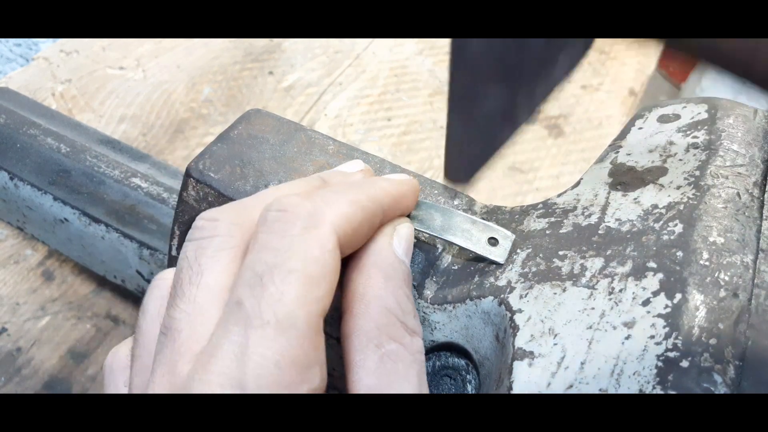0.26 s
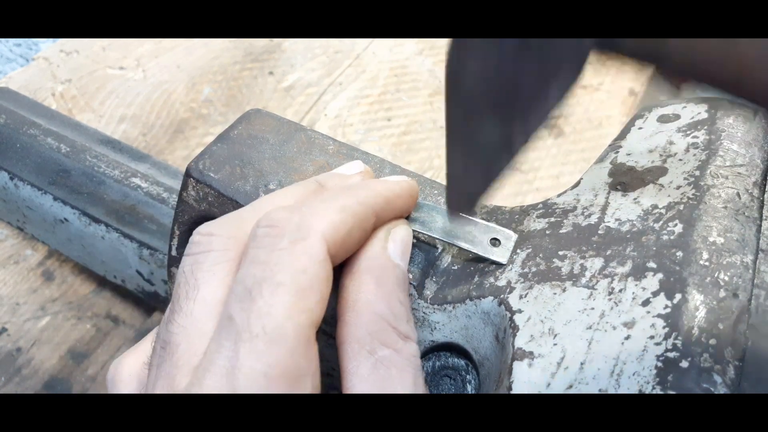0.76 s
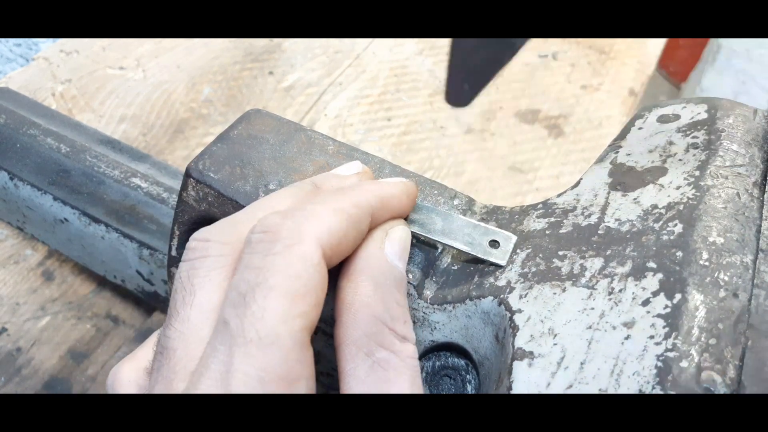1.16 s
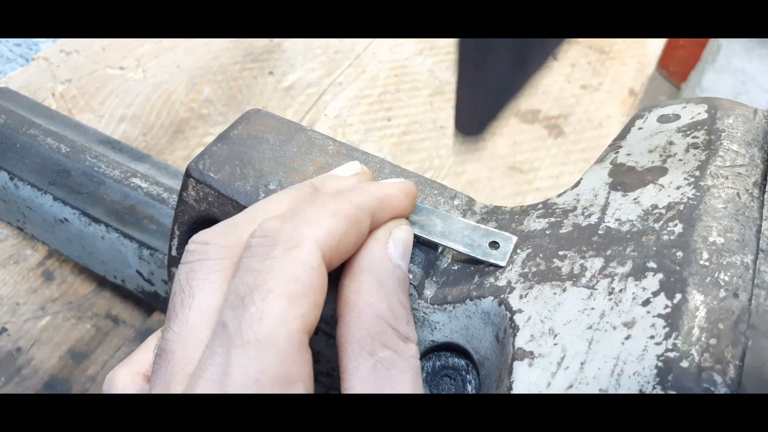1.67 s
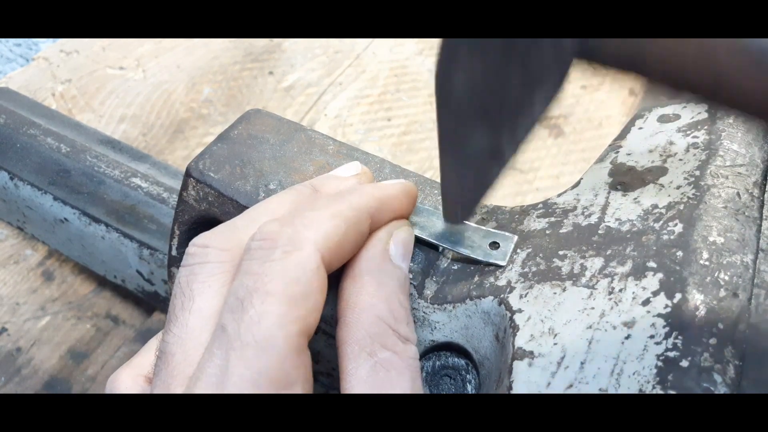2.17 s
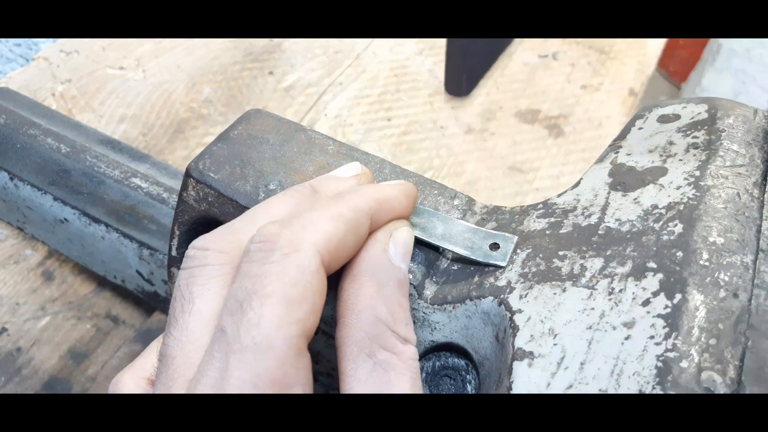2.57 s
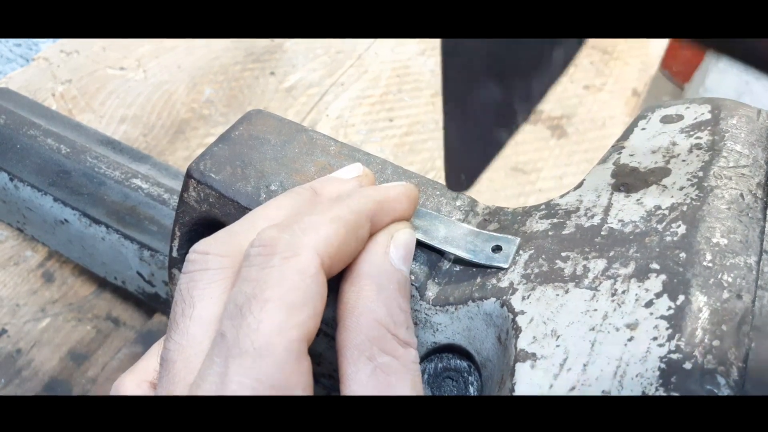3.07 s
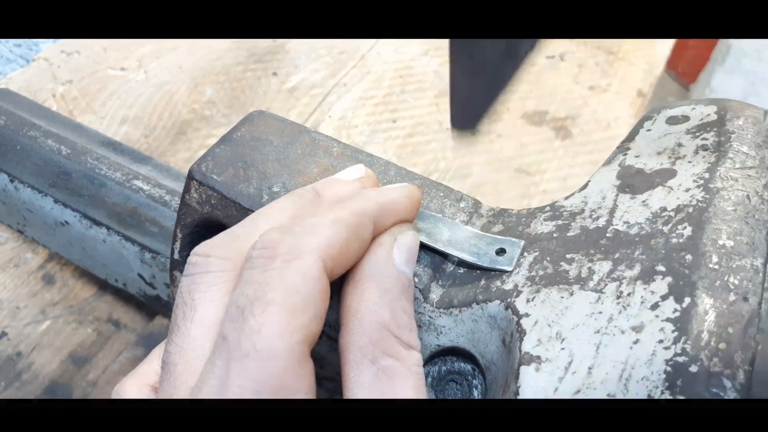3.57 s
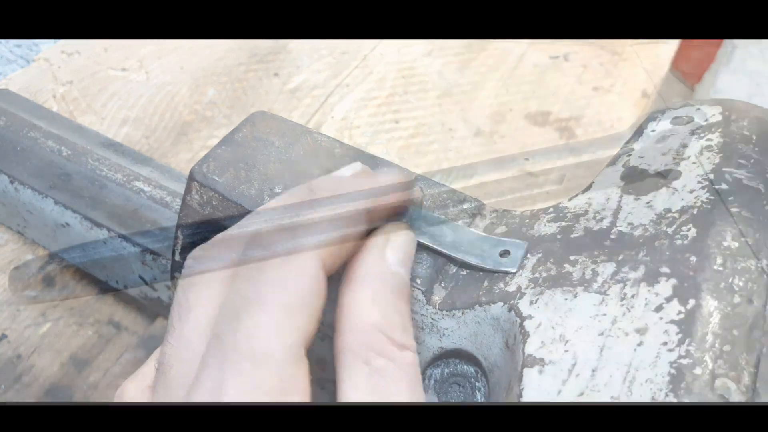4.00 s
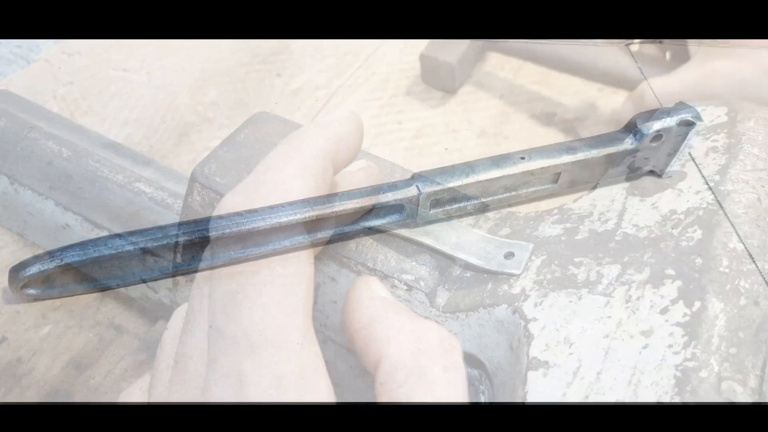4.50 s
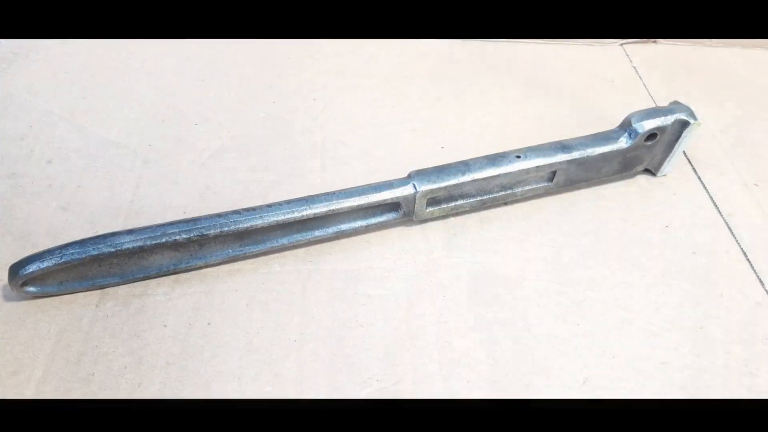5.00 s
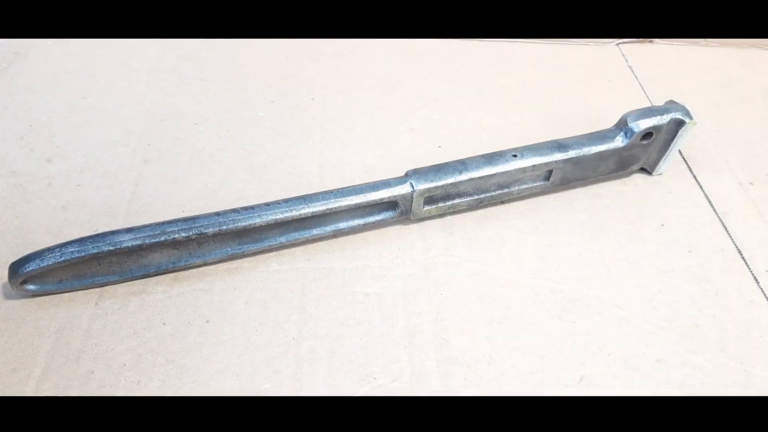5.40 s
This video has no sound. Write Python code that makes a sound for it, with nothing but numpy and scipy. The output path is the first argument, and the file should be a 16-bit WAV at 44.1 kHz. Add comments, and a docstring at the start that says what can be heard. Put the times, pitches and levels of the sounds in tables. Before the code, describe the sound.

A hammer taps a small steel strip on a bench vise anvil, light then firmer, each sharp click followed by a woody bench boom.

```python
"""In a small workshop, a hammer taps a steel strip held by hand on the anvil of a bench vise, close by.
Each blow is filtered noise bursts for strike, slap and bounce, with a dull clank of the hammer head.
The wooden bench booms a few milliseconds later in wandering sine modes, with a noise rattle; the room answers.
Low rumble and faint gliding whistles lie beneath; after the last blow a soft distant rush of noise comes up."""
import sys
import numpy as np
from scipy import signal
from scipy.fft import rfft, irfft, next_fast_len
from scipy.io import wavfile
from scipy.ndimage import uniform_filter1d

SR = 44100
rng = np.random.default_rng(int(sys.argv[2]) if len(sys.argv) > 2 else 0)


def pcm_store(signal):
    """Save signal as 16-bit PCM."""
    levels = np.round(np.clip(np.atleast_2d(signal), -1, 1) * 32767)
    wavfile.write(sys.argv[1], SR, levels.astype(np.int16).T)


N = 249165
T = np.arange(SR) / SR  # seconds: the one-second span of each blow
PAN_SIDES = np.array([[.5], [-.5]])  # share of a pan in dB for left and right


def undb(db):
    """Decibels to gain."""
    return 10 ** (np.asarray(db) / 20)


def fade(t60_s):
    """Exponential decay that loses 60 dB in t60_s seconds."""
    return np.exp(-np.log(1000) * T / t60_s)


def unit(x):
    """Scale to unit energy, averaged over the channels."""
    return x / np.sqrt(np.mean(np.sum(x ** 2, axis=-1)))


def bins(x):
    """Spectrum frequencies of x in Hz, kept at 1 or above for the logarithm."""
    return np.maximum(np.fft.rfftfreq(x.shape[-1], 1 / SR), 1)


def along(hz, points_hz, values):
    """Read values off a curve on a log-frequency axis."""
    return np.interp(np.log(hz), np.log(points_hz), values)


def over_time(t, curve):
    """Read an automation curve of (time, value) points."""
    return np.interp(t, *np.transpose(curve))


def colour(x, spectrum):
    """Minimum-phase filter that follows (Hz, dB) points, so nothing sounds ahead of its cause."""
    size = next_fast_len(x.shape[-1] + 4096) // 2 * 2
    gain_db = along(bins(np.empty(size)), *np.transpose(spectrum))
    # folding the cepstrum onto positive times makes the filter causal
    cepstrum = irfft(np.log(undb(gain_db)))
    cepstrum[1:size // 2] *= 2
    cepstrum[size // 2 + 1:] = 0
    return irfft(rfft(x, size) * np.exp(rfft(cepstrum)))[..., :x.shape[-1]]


def air(size, apart_hz):
    """Stereo noise, alike in the bass and unrelated above apart_hz."""
    mid, side = rng.standard_normal((2, size))
    width = np.clip(bins(side) / apart_hz, .22, 1)
    side = irfft(rfft(side) * width, size)
    return np.array([mid + side, mid - side])


def add(out, x, start_s):
    """Mix x into out from start_s on, trimming whatever falls outside."""
    i = int(round(start_s * SR))
    a, b = max(i, 0), min(i + x.shape[-1], out.shape[-1])
    out[:, a:b] += x[:, a - i:b - i]


def burst(t60_s):
    """A short crack: decaying noise with its spectrum evened out, then faded once more."""
    spectrum = rfft(rng.standard_normal((2, SR)) * fade(t60_s))
    evened = irfft(spectrum / np.abs(spectrum) ** .7, SR)
    return unit(evened * fade(4 * t60_s))


def contact(t60_s=0.0083):
    """One touch of steel; such short waves reach the two channels partly in opposite phase."""
    crack = burst(t60_s)
    return unit(crack - .17 * crack[::-1])


# tone of steel on steel, before the resonances of the strip: pitch_hz, density_db [dB per Hz]
STEEL_TONE = [(150, -14.5), (500, -4), (1100, -16), (2400, -17), (3600, -18.5), (4900, -14), (6200, -9.5),
              (6900, -10.5), (8300, -6.5), (10200, -7), (11900, -5), (13500, 2), (15600, -5)]


def clatter(ring_db, low_hz, high_hz, slap_ms, slap_db, bounce_ms, bounce_db,
            chatter_db=-10.0, chatter_t60_s=0.16, ring_width_hz=500, lift_db=7.5):
    """The hammer meets the strip, the strip slaps the anvil, bounces once and chatters to rest."""
    out = np.zeros((2, SR))
    for lag_ms, level_db in ((0, 0), (slap_ms, slap_db), (bounce_ms, bounce_db)):
        add(out, undb(level_db) * contact(), lag_ms / 1000)
    out = unit(out) + undb(chatter_db) * burst(chatter_t60_s)
    hz = np.geomspace(100, 17000, 400)
    # fingers and anvil damp the strip, so its two resonances are broad
    rings_db = sum(lift_db / (1 + ((hz - centre) / ring_width_hz) ** 2) for centre in (low_hz, high_hz))
    tone_db = along(hz, *np.transpose(STEEL_TONE)) + rings_db
    out = unit(colour(out, np.c_[hz, tone_db]))
    return colour(out, [(3000, -3.0), (6000, ring_db + 9), (9000, ring_db + 3.0), (11500, -0.53)])


# tone of the hammer head stopping dead: pitch_hz, density_db [dB per Hz]
CLANK_TONE = [(150, -20.5), (400, 10), (900, 2), (1500, -3.5), (2500, -1.5), (3300, -10), (6000, -30)]


def clank(pan_db=-10, gain_db=3):
    """A square blow stops the head at once: a single pressure pulse, heard mostly on the right."""
    pulse = unit(colour(signal.unit_impulse(SR), CLANK_TONE))
    return undb(gain_db) * unit(pulse * undb(pan_db * PAN_SIDES))


# modes of bench and vise, before the force of the blow: pitch_hz, level_db
BENCH_MODES = [(46, -19.5), (63, -14), (86, -13.5), (110, -15), (140, -18), (165, -15), (184, -9),
               (218, -8.5), (254, -1), (290, -0.5), (316, -0.5), (351, -1.5), (385, -19), (422, -7.5),
               (484, -20), (544, -14), (630, -13.5), (686, -23), (715, -8), (743, -30), (790, -16),
               (834, -26.5), (931, -8), (990, -14), (1114, -21.5), (1184, -20), (1480, -14.5),
               (1798, -30.5), (2460, -24), (3052, -24)]
# how long the modes ring: pitch_hz, t60_s
BENCH_RING_TIMES = [(60, .9), (150, .55), (260, .38), (800, .38), (3000, .33)]
# loose wood and things on the bench, before the force of the blow: pitch_hz, density_db [dB per Hz]
RATTLE_TONE = [(25, -35.5), (50, -16), (130, -13), (270, -1), (430, -4), (550, -11.5), (760, 2), (950, -2),
               (1300, -18), (2000, -25), (2500, -30.5), (3500, -29), (8000, -40)]


def bench(thud_db, knock_db, crunch_db, phases, rise_s=0.0006, ring_db=-8, rattle_db=-5,
          rattle_t60_s=.16, sag=0.13, apart_hz=900):
    """The bench booms in its modes and rattles; firm blows wake the upper ones, the deepest vary little."""
    hz, mode_db = np.transpose(BENCH_MODES)
    drive = [(110, sag * thud_db + 9.5), (250, thud_db), (420, thud_db),
             (650, knock_db + 6.0), (1000, knock_db + 3.5), (1500, crunch_db + 17.0)]
    gains = undb(mode_db + along(hz, *np.transpose(drive)))
    times_s = along(hz, *np.transpose(BENCH_RING_TIMES))
    boom = np.zeros((2, SR))
    for f, gain, t60_s, (phase, spread) in zip(hz, gains, times_s, phases):
        stereo_phase = np.array([[1], [-1]]) * spread * np.clip(f / apart_hz, .2, 1) / 2
        # random pitch wander roughens each ringing mode
        wander = np.interp(T, np.linspace(0, 1, 60), rng.standard_normal(60)) * .02
        angle = 2 * np.pi * f * np.cumsum(1 + wander) / SR
        boom += gain * unit(np.sin(angle + phase + stereo_phase) * fade(t60_s))
    rattle = unit(colour(air(SR, 1900) * fade(rattle_t60_s), RATTLE_TONE))
    out = undb(ring_db) * boom + undb(rattle_db) * colour(rattle, drive)
    return out * (1 - np.exp(-T / rise_s))


# the room, band by band: pitch_hz, level_db [reverberant], t60_s
ROOM_BANDS = [(100, -0.5, 0.55), (684, 2, 0.51), (1500, -6.5, 0.7), (2846, -2.5, 0.49), (5370, -11.5, 0.48),
              (7900, -13, 0.45), (12200, -11.5, 0.33), (15170, -16.5, .32)]


def workshop(x, echo_s=.028, echo_db=-19, echo_t60_s=0.043, build_s=0.014):
    """A diffuse tail that dies sooner in the treble, and one early scatter off the ceiling."""
    hz, levels_db, times_s = np.transpose(ROOM_BANDS)
    noise = rfft(air(SR, 1000))
    response = np.zeros((2, SR))
    for share, level_db, t60_s in zip(np.eye(len(hz)), levels_db, times_s):
        band = irfft(noise * along(bins(T), hz, share), SR)
        envelope = unit(fade(t60_s) * (1 - np.exp(-T / build_s)))
        response += undb(level_db) * band * envelope / np.sqrt(2)
    scatter = unit(rng.standard_normal((2, SR)) * fade(echo_t60_s))
    add(response, undb(echo_db) * scatter, echo_s)
    return signal.fftconvolve(x, response, axes=1)[:, :x.shape[1]]


# a sharper click kicks the strip higher, so it slaps down later; SLAP_MS is the lag at a click of 0 dB
SLAP_MS, SLAP_MS_PER_DB, SLAP_DB, BOUNCE_DB = .5, 0.21, 2, -5
# lower resonance of the strip; largest share by which it moves from blow to blow
LOW_RING_HZ, LOW_RING_SPREAD = 8115, .04
# crunch, the drive of the topmost bench modes: at a thud and knock of 0 dB; its floor under light taps
CRUNCH_DB, CRUNCH_LEAST_DB = -25, -26.5
CRUNCH_PER_THUD, CRUNCH_PER_KNOCK = 1.655, .75  # dB per dB
# one row a blow, light taps first and firm ones later, relative levels; the ring moves with the spot struck:
# start_s, click_db [steel], thud_db [bench], knock_db [bench], clank_db [hammer],
# ring_db [5-10 kHz, against the click], high_ring_hz
HAMMER_BLOWS = [(-0.045, -0.5, -6.5, -20.5, -23.5, -4, 13300), (0.2322, 3, -6.5, -19, -26.5, -3, 13500),
                (0.5072, 1.7, -4.5, -17, -24.5, -3.5, 13600), (0.7813, 6.5, 5, -9.5, -16, -6, 11500),
                (1.0653, 5, -2.5, -14.5, -24.5, -4.5, 13000), (1.3509, 7.5, 4.5, -13.5, -19.5, -7, 13500),
                (1.6391, 9.5, 6.5, 2, -1.5, -7.5, 11400), (1.9295, 6, 9, 2, -11.5, -8.5, 11540),
                (2.206, 4.5, 4, 0.5, -16.5, -4, 13070), (2.4891, 4.5, 10, 5, -13, -6.5, 12150),
                (2.7802, 5.5, 6.5, 3.5, -14, -4.5, 12320), (3.512, 6.5, 4.5, 1.5, -1.5, -8, 12500),
                (3.8197, 3.5, 10, 4.5, -16, -6.5, 12050)]
# heavier blows bounce for longer, up to a limit: thud_db, bounce_lag_ms
BOUNCE_LAGS = [(-6, 3.5), (0.5, 6.6)]


def hammering(near_db=1.92, bench_lag_s=0.0041, steel_pan_db=-3, bench_pan_db=-0.7, bench_room_db=-4):
    """All blows with their room; the force of each sets its slap, bounce and crunch."""
    out = np.zeros((2, N))
    phases = rng.uniform(-np.pi, np.pi, (len(BENCH_MODES), 2))
    for start_s, click_db, thud_db, knock_db, clank_db, ring_db, high_hz in HAMMER_BLOWS:
        slap_ms = SLAP_MS + SLAP_MS_PER_DB * click_db
        bounce_ms = np.interp(thud_db, *np.transpose(BOUNCE_LAGS))
        low_hz = LOW_RING_HZ * (1 + LOW_RING_SPREAD * rng.uniform(-1, 1))
        crunch_db = CRUNCH_DB + CRUNCH_PER_THUD * thud_db + CRUNCH_PER_KNOCK * knock_db
        crunch_db = max(CRUNCH_LEAST_DB, crunch_db)
        strip = clatter(ring_db, low_hz, high_hz, slap_ms, SLAP_DB, bounce_ms, BOUNCE_DB)
        steel = undb(click_db) * strip
        wood = np.zeros((2, SR))
        add(wood, bench(thud_db, knock_db, crunch_db, phases), bench_lag_s)
        near_steel = steel * undb(near_db + steel_pan_db * PAN_SIDES)
        near_wood = wood * undb(bench_pan_db * PAN_SIDES)
        add(out, near_steel + near_wood, start_s)
        add(out, undb(clank_db) * clank(), start_s + slap_ms / 1000)
        # each blow draws a fresh diffuse noise tail
        add(out, workshop(steel + undb(bench_room_db) * wood), start_s)
    return out


def steady(spectrum):
    """Continuous stereo noise of the given tone, at unit power."""
    return unit(colour(air(N, 1200), spectrum)) * np.sqrt(N)


RUMBLE_DB = -53  # base that the level curve is added to
# tone of the low workshop rumble: pitch_hz, density_db [dB per Hz]
RUMBLE_TONE = [(20, -31), (35, -20), (58, -2.5), (90, -4.5), (150, -14.5), (310, -9.5), (450, -25.5),
               (900, -32), (1600, -45.5), (4000, -55.5), (16000, -50.5)]
# its slow level ride, on top of the base: time_s, level_db
RUMBLE_RIDE = [(0, -3.5), (3.4, -3), (4.3, -4.5), (4.7, -6), (5.65, -8)]


def rumble():
    """A low bed of filtered noise whose level sinks towards the end."""
    t = np.arange(N) / SR
    return steady(RUMBLE_TONE) * undb(RUMBLE_DB + over_time(t, RUMBLE_RIDE))


WHISTLE_DB, WHISTLE_DB_PER_OCTAVE = -71.5, -2  # peak at 2.5 kHz; the high ones are fainter
# faint thin whistles around the blows: start_s, end_s, start_hz, middle_hz, end_hz
WHISTLE_GLIDES = [(0.134, 0.208, 8100, 7650, 6900), (.99, 1.081, 2280, 2500, 2530),
                  (1.156, 1.375, 2560, 2632, 2620), (1.521, 1.673, 2560, 2570, 2800),
                  (2.376, 2.496, 8800, 9200, 7200), (2.656, 2.798, 8300, 9360, 7230)]


def whistles():
    """Faint gliding sines that swell and fade, most of them leading up to a blow."""
    out = np.zeros((2, N))
    for start_s, end_s, *glide_hz in WHISTLE_GLIDES:
        u = np.linspace(0, 1, int((end_s - start_s) * SR))
        hz = np.polyval(np.polyfit([0, .5, 1], glide_hz, 2), u)
        # pitch jitter, drawn apart for each channel, blurs the tone
        jittered_hz = hz + 900 * rng.standard_normal((2, len(u)))
        phase = 2 * np.pi * np.cumsum(jittered_hz, axis=1) / SR
        level_db = WHISTLE_DB + WHISTLE_DB_PER_OCTAVE * np.log2(hz / 2500)
        add(out, undb(level_db) * np.sin(np.pi * u) * np.sin(phase), start_s)
    return out


def waver(x, depth_db=3.0):
    """Patches about a tenth of a second long swell and sink in neighbouring frequencies."""
    spectra = signal.stft(x, nperseg=512)[2]
    field = rng.standard_normal(spectra.shape[1:])
    for _ in range(2):
        field = uniform_filter1d(field, size=7, axis=0)  # across frequency
        field = uniform_filter1d(field, size=21, axis=1)  # across time
    gain = undb(depth_db * field / field.std())
    return signal.istft(spectra * gain)[1][:, :N]


RUSH_START_S, RUSH_BRIGHTENS_DB_PER_S = 4.38, 9
# body of the distant rush: pitch_hz, density_db [dB per Hz]
RUSH_BODY_TONE = [(150, -53), (250, -35), (301, -6), (356, -11.5), (518, -2.5), (563, -11), (671, 1),
                  (1710, -28.5), (2080, -27), (3000, -50), (3900, -76), (6600, -120)]
# the low drone under it: pitch_hz, density_db [dB per Hz]
RUSH_DRONE_TONE = [(35, -70), (70, -26), (97, 0.5), (110, -1), (145, -24), (320, -68)]
# its upper part, which comes forward as it goes on: pitch_hz, density_db [dB per Hz]
RUSH_EDGE_TONE = [(500, -40), (780, 5), (900, 3.5), (1050, -4), (1350, -5), (1650, -11.5), (2150, -20),
                  (2900, -37), (5000, -53)]
# swell shared by body, drone and edge, on top of their mix levels: time_s, level_db
RUSH_SWELL = [(4.42, -66), (4.598, -64.5), (5.018, -61.5), (5.248, -66), (5.458, -61), (5.65, -71.5)]
# the thin hiss over it: pitch_hz, density_db [dB per Hz]
RUSH_HISS_TONE = [(1470, -8), (2500, -4), (3130, -11.5), (3890, -6), (7300, -14), (9960, -12.5),
                  (16000, -21)]
# level ride of the hiss, on top of its mix level: time_s, level_db
RUSH_HISS_RIDE = [(4.42, -77), (4.824, -77), (5.234, -84), (5.3, -76.5), (5.65, -77)]


def rush(body_db=0, drone_db=-3, edge_db=-11, hiss_db=4):
    """Near the end a thin hiss sets in, and a distant rush of noise swells and brightens over a drone."""
    t = np.arange(N) / SR
    age_s = np.maximum(t - RUSH_START_S, 0)
    roar = undb(body_db) * steady(RUSH_BODY_TONE) + undb(drone_db) * steady(RUSH_DRONE_TONE)
    roar += undb(edge_db + RUSH_BRIGHTENS_DB_PER_S * age_s) * steady(RUSH_EDGE_TONE)
    swelling = roar * undb(over_time(t, RUSH_SWELL))
    hiss = steady(RUSH_HISS_TONE) * undb(hiss_db + over_time(t, RUSH_HISS_RIDE))
    fade_in = np.clip(age_s / .045, 0, 1)
    return waver(swelling + hiss) * fade_in


def scene():
    """Hammering over the quiet of the workshop."""
    return hammering() + rumble() + whistles() + rush()


TOP_HZ = 16200  # upper edge of the band that is kept


def record(dry):
    """Soft saturation rounds the sharpest peaks, then a steep low-pass cuts the top."""
    rounded = np.tanh(dry)
    low_pass = signal.ellip(10, .2, 80, TOP_HZ, fs=SR, output="sos")
    return signal.sosfilt(low_pass, rounded)


dry = scene()
out = record(dry)
pcm_store(out)
```